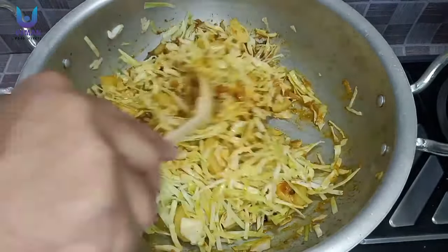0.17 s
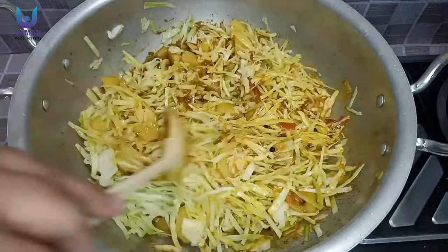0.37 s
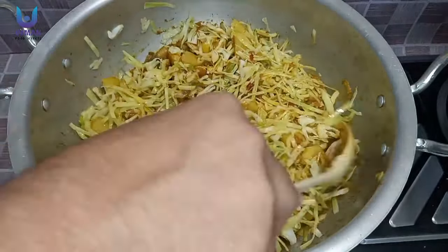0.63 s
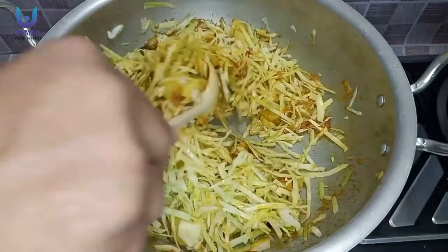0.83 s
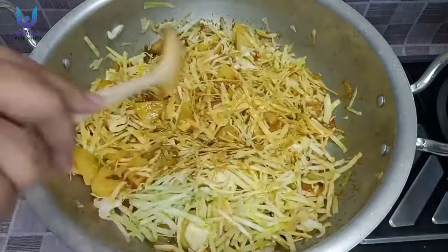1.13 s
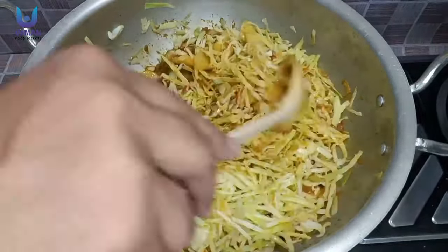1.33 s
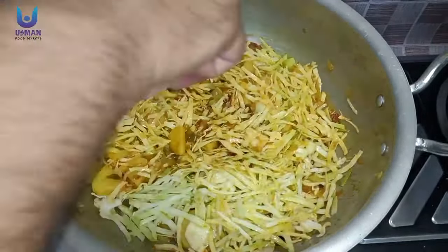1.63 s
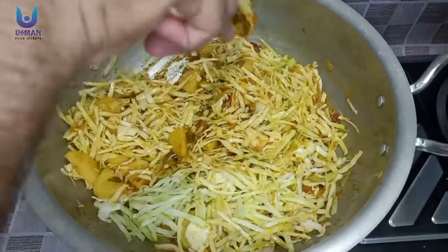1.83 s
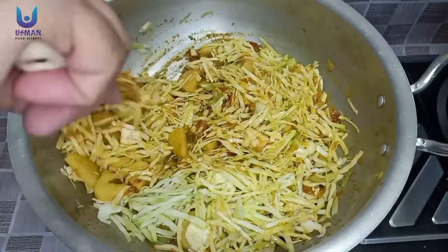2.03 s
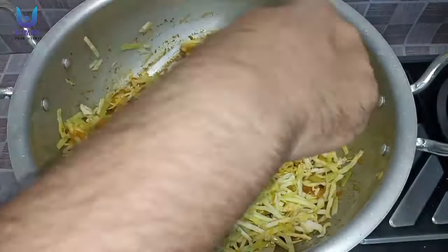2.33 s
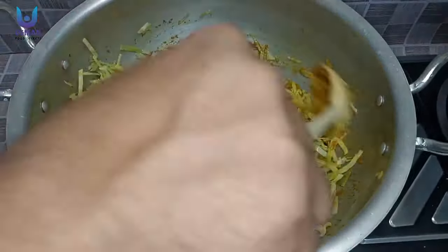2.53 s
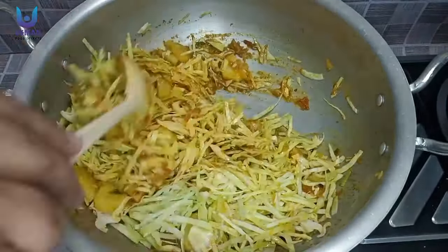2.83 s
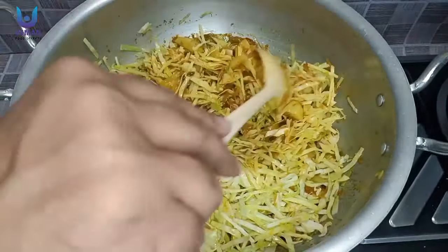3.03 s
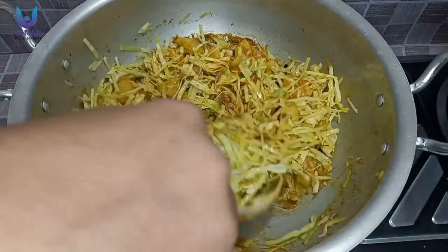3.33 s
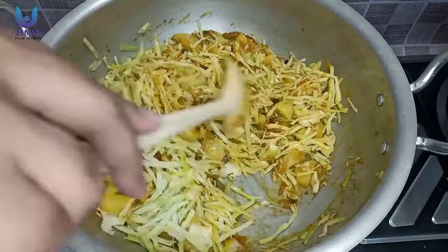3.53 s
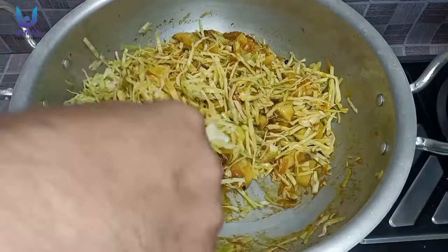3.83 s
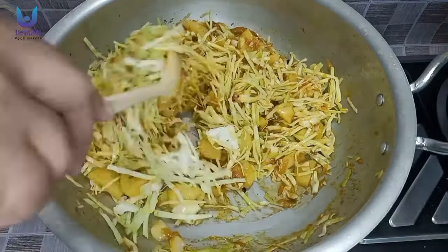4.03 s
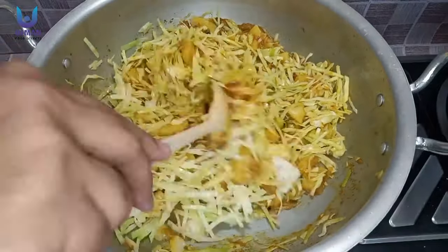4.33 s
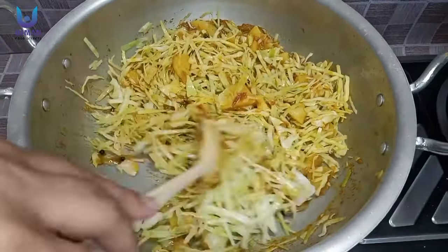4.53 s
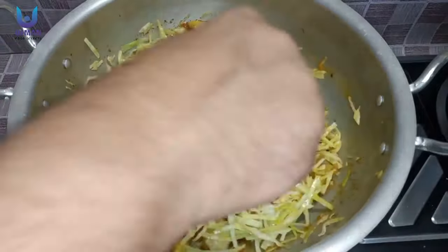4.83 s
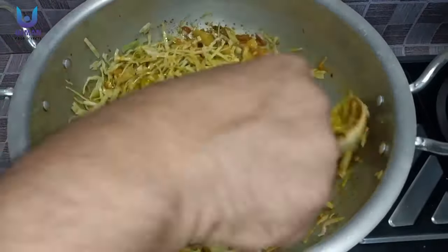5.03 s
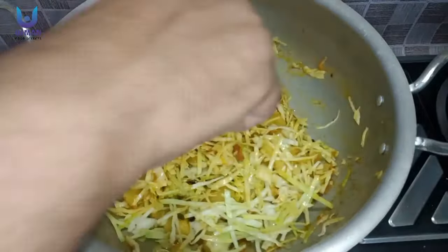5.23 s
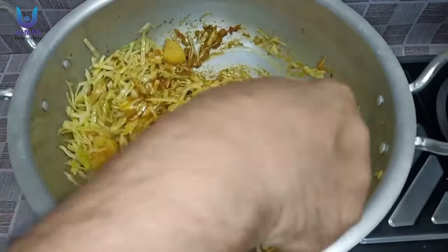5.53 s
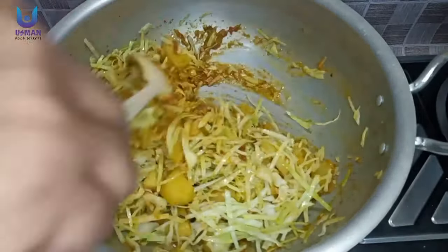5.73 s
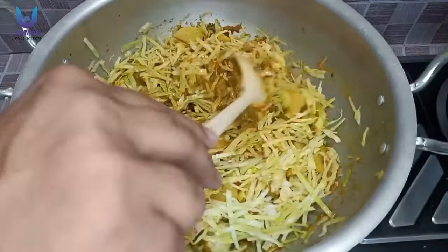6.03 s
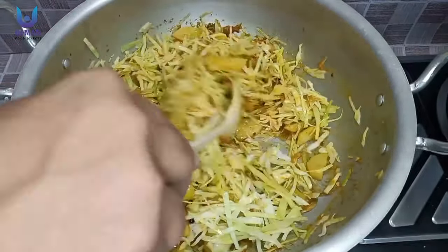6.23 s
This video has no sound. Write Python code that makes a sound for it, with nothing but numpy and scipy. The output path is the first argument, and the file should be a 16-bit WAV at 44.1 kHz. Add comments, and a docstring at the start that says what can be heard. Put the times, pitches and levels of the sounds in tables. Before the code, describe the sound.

Over the faint, steady hiss of oil and a gas burner, shredded vegetables rustle and crunch as they are turned in a metal pan. The wooden spoon strikes the pan with a short, bright clank early on, then twice more as the stirring continues. Light taps, dull scrapes and tiny squeaks fall in between. The sound is close, with a little small-kitchen echo.

```python
"""Shredded vegetables rustle and crunch as a wooden spoon stirs them in a wide metal pan.
Their sound is a sum of tiny random impulses that swells with each stroke. Friction makes the spoon
scuff and squeak along the bottom; light impacts click on the wall, and three knocks set the pan's
normal modes ringing. A small kitchen reflects these sounds. Under them lie the faint broadband
noise of sizzling oil and a gas burner, and a weak hum."""
import sys
import numpy as np
from scipy import signal
from scipy.fft import rfft, irfft, next_fast_len
from scipy.io import wavfile
from scipy.ndimage import uniform_filter1d

SR = 44100
rng = np.random.default_rng(int(sys.argv[2]) if len(sys.argv) > 2 else 0)


def pcm_store(signal):
    """Save signal as 16-bit PCM."""
    levels = np.round(np.clip(np.atleast_2d(signal), -1, 1) * 32767)
    wavfile.write(sys.argv[1], SR, levels.astype(np.int16).T)


N = 281954
BAND_EDGE_HZ = 15580

# Strokes through the shreds. Each row: fastest moment in seconds, rise and fall times in seconds,
# relative level in dB, weight of wet crunch over dry rustle in dB.
STROKES = [(0.02, 0.034, 0.087, -65.5, 6.5), (0.285, 0.055, .05, -65, 5.5), (0.51, 0.04, .04, -68, 4.5),
           (0.825, 0.034, 0.023, -56.5, 3), (0.98, 0.13, 0.08, -70.5, 1), (1.13, 0.042, 0.047, -60, 2.5),
           (1.34, 0.071, 0.07, -67.5, 1), (1.635, 0.02, 0.038, -76, 4), (1.752, 0.027, 0.015, -64, 7.5),
           (2.52, 0.18, 0.11, -66.5, 3.5), (2.79, 0.081, 0.087, -69, 4.5),
           (3.045, 0.079, 0.054, -64.5, 4.5), (3.35, .02, 0.024, -59.5, -20),
           (3.462, 0.077, 0.026, -55.5, -2), (3.66, 0.16, 0.071, -75.5, -2), (3.9, 0.1, 0.087, -60.5, -1),
           (3.975, 0.029, 0.051, -65.5, 6.5), (4.41, 0.065, .035, -60, 0), (4.63, 0.049, 0.036, -61, -3),
           (4.875, 0.026, 0.015, -59, -3), (4.95, 0.096, 0.063, -62.5, 1), (5.21, 0.036, 0.014, -63.5, 4.5),
           (5.39, 0.067, 0.11, -70, -1), (5.65, 0.07, 0.062, -59, -1.5), (5.78, 0.027, 0.063, -78, 13.5),
           (6.045, 0.079, 0.078, -64, 2.5), (6.28, 0.013, 0.02, -52, -12)]
# Spectra of the dry rustle and the wet crunch. Each row: frequency in Hz, relative density in dB.
RUSTLE_SPECTRUM = [(1500, -16), (3000, -1.5), (4500, 5.5), (6500, 10.5), (8300, 3.5), (10200, -5),
                   (12000, -15), (15500, -38)]
CRUNCH_SPECTRUM = [(150, -29), (400, -9), (1300, -6.5), (1850, -1.5), (2200, -6), (2900, 0.5), (3800, -7),
                   (6000, -15)]

# Knocks on the pan. Each row: start in seconds, level in dB, tilt in dB per octave,
# cutoff of the soft contact in Hz.
KNOCKS = [(0.6776, -25.5, 0.5, 5560), (2.3270, -30.5, -0.5, 3750), (5.0833, -28.5, .5, 4860)]
# Long-lived modes of the pan. Each row: frequency in Hz, relative level in dB, 60 dB decay in seconds.
PAN_MODES = [(565, -29, .33), (797, -28, .3), (1008, -15.5, .39), (1190, -19, .28), (1290, -13, .25),
             (1321, -13, .22), (1357, -9.5, .23), (1381, -12, .15), (1455, -13, .16), (1497, -16, .18),
             (1645, -19, .18), (1749, -19, .2), (2219, -15, .14), (2254, -3.5, .19), (2283, -13, .18),
             (2377, -11, .24), (2865, -23, .25), (3323, -15, .2), (3425, -9, .13), (3463, -1.5, .23),
             (3493, -7, .15), (4092, -18, .18), (4396, -11, .15), (4422, -8, .19), (4451, -12, .16),
             (5150, -16, .2)]
# Spectrum of the dense modes that the food damps. Each row: frequency in Hz, relative density in dB.
CLANK_SPECTRUM = [(90, -27), (240, -21.5), (400, -2.5), (500, -19.5), (900, -6.5), (1400, 3.5), (1900, -1),
                  (3000, -2.5), (4500, 3.5), (6000, -4), (8200, -4.5), (10000, -8.5), (12000, 0.5),
                  (15500, -10)]

# Light taps on wall and rim. Each row: start in seconds, level in dB, tilt in dB per octave,
# relative levels of snap and ring in dB.
CLICKS = [(1.6284, -58, 4, 1, -26), (1.7337, -58, -2, 7, -34), (1.9749, -39, -0.5, 5, -9.5),
          (2.026, -43, 5, -10, -21), (2.0742, -49.5, -4.5, 2.5, -14), (3.2397, -43.5, .5, 3, -30),
          (3.8937, -50, 0, 4.5, -33), (4.873, -52, -1.5, -8, -12), (5.1127, -39, -1, -4, -35),
          (5.5806, -45, 9.5, -15, -22), (6.271, -50, 2.5, -10, -39)]
# Spectrum of a tap. Each row: frequency in Hz, relative density in dB.
CLICK_SPECTRUM = [(100, -15), (300, -9), (650, -11.5), (1100, -6), (1700, -1), (2600, 17), (3900, -5),
                  (4600, 16), (5500, 6.5), (6500, 10), (8400, 7.5), (10200, -3.5), (12000, 5),
                  (15500, -7.5)]
# Modes of the rim. Each row: frequency in Hz, relative level in dB, 60 dB decay in seconds.
RIM_MODES = [(560, -14, .5), (871, -9, 0.22), (1334, -6.5, 0.14), (2460, 1, 0.14), (2520, -7, .14),
             (2530, -10, .12), (3410, 6, 0.08), (4300, 5, 0.08), (4710, -6, 0.13), (5000, -13, 0.12),
             (6025, -4, 0.2), (8600, -1, 0.09), (11850, -12, 0.16), (14320, -8, .15)]

# Dull scuffs of the spoon, and low thuds under two knocks. Each row: start in seconds, level in dB,
# rise in seconds, 60 dB decay in seconds, tilt in dB per octave.
SCUFFS_AND_THUDS = [(0.17, -62, 0.021, 1, -1.5), (0.684, -57, 0.018, 0.54, -10),
                    (1.05, -62.5, 0.0088, 0.24, -10), (1.976, -55, 0.0043, 0.21, -2.5),
                    (2.83, -58.5, 0.059, 0.092, -3.5), (2.968, -57.5, 0.014, 0.27, 4),
                    (3.037, -46.5, 0.0083, 0.11, -1.5), (3.240, -56.5, 0.0014, 0.25, -3.5),
                    (5.088, -54.5, 0.03, 0.17, -4), (5.757, -60, 0.0082, 0.19, -1),
                    (5.960, -58, 0.0066, 0.24, 3), (6.039, -43, 0.0032, 0.16, -0.5),
                    (6.23, -61.5, 0.055, 0.2, -4.5)]
# Spectrum of a scuff or thud. Each row: frequency in Hz, relative density in dB.
DULL_SPECTRUM = [(90, -34), (190, -13), (290, 4.5), (400, 0), (500, -0.5), (600, 7.5), (800, 4.5),
                 (1200, 2.5), (1800, 2.5), (2600, -6), (4000, -18), (8000, -29), (15000, -70)]
# Squeaks of the spoon, and one brief faint ring of the pan. Each row: start and length in seconds,
# first and last pitch in Hz, level in dB, rms jitter as a fraction of the pitch.
SQUEAKS_AND_RING = [(0.05, 0.18, 2590, 2640, -70, .02), (0.19, 0.12, 692, 885, -67.5, 0.11),
                    (1.045, 0.08, 555, 354, -71, 0.14), (1.07, 0.14, 330, 245, -73.5, 0.066),
                    (1.44, 0.237, 1271, 1214, -73.5, 0.018), (1.69, 0.14, 1160, 1110, -75, 0.025),
                    (1.725, 0.063, 2290, 2275, -62, 0.036), (4.04, 0.16, 1416, 1143, -72, 0.16)]

# Spectrum of burner and sizzle. Each row: frequency in Hz, relative density in dB.
STOVE_SPECTRUM = [(25, -17), (65, -22.5), (100, -8.5), (150, 0.5), (260, 3), (450, -8), (800, -4.5),
                  (1400, -9.5), (2700, -6), (4500, -6.5), (6500, -8.5), (8500, -5), (10200, -12),
                  (15500, -12.5)]
# Faint tones of the kitchen. Each row: mean frequency in Hz, level in dB.
HUM_TONES = [(565, -81), (1195, -87), (1787, -84), (2622, -85)]


def shreds(rustle_db=-1, crunch_db=-2, clump_db=0.8, idle_rustle_db=-74, idle_crunch_db=-75.5):
    """Incoherent addition: strips slide and snap independently, so the strokes add in power."""
    t = np.arange(N) / SR
    power = amp([[idle_rustle_db], [idle_crunch_db]]) ** 2  # the spoon never quite rests
    for peak_s, rise, fall, db, wet_db in STROKES:
        motion = stroke(t - peak_s, rise, fall)
        power = power + (amp([[db], [db + wet_db]]) * motion) ** 2
    dry_level, wet_level = np.sqrt(power) * amp(clump_db * drift(N, rate_hz=15))
    rustle = colour(dry_level * grains(N, per_s=7700, spread_db=3), RUSTLE_SPECTRUM)
    crunch = colour(wet_level * grains(N, per_s=5000, spread_db=0.4), CRUNCH_SPECTRUM)
    return amp(rustle_db) * rustle + amp(crunch_db) * crunch


def stroke(t, rise, fall, settle_db=-11, settle_t60=0.91):
    """Forcing and relaxation: a Gaussian push peaks at t = 0, then the heap settles exponentially."""
    push = np.exp(-(t / np.where(t < 0, rise, fall)) ** 2)
    settling = amp(settle_db) * fade(np.abs(t), settle_t60) * (t > 0)
    return np.maximum(push, settling)


def clumps(x, depth_db=3.0):
    """Spectral modulation: each clump of shreds has its own colour for a moment."""
    frames = dict(nperseg=512, noverlap=384)
    spectra = signal.stft(x, **frames)[2]
    patches = uniform_filter1d(rng.standard_normal(spectra.shape), size=8, axis=0)  # over frequency
    patches = uniform_filter1d(patches, size=12, axis=1)  # over time
    return signal.istft(spectra * amp(depth_db * unit_rms(patches)), **frames)[1][:N]


def knock(steel, db, tilt, cutoff_hz, clank_db=-4, clank_t60=0.088, sheen_db=-13, contact_s=0.0019):
    """Impact excitation: a blow starts the pan's long modes, a damped clank and the steel's shimmer."""
    def force_db(hz, floor_db=-19):
        """Compliant contact: wood gives way, so the force holds little above the cutoff."""
        low_pass = 1 / (1 + (hz / cutoff_hz) ** 6)
        return tilt * np.log2(hz / 2500) + 10 * np.log10(low_pass + amp(floor_db) ** 2)
    t = np.arange(len(steel)) / SR
    tone = ring([(hz, level + force_db(hz), t60) for hz, level, t60 in PAN_MODES], t)
    burst = fade(t, clank_t60) * rng.standard_normal(len(t))
    clank = colour(burst, [(hz, level + force_db(hz)) for hz, level in CLANK_SPECTRUM])
    sheen = colour(steel, [(hz, level + force_db(hz, floor_db=-11)) for hz, level in CLANK_SPECTRUM])
    onset = np.minimum(t / contact_s, 1)
    return amp(db) * (tone + amp(clank_db) * clank + amp(sheen_db) * sheen) * onset


def click(steel, db, tilt, snap_db, ring_db,
          snap_t60=0.029, shimmer_db=-12, rattle_db=-13, rattle_t60=0.25):
    """Impact transient: a sharp snap rattles on while the steel shimmers and the rim rings."""
    t = np.arange(len(steel)) / SR
    envelope = amp(snap_db) * fade(t, snap_t60) + amp(rattle_db) * fade(t, rattle_t60)
    strike = envelope * rng.standard_normal(len(t))
    tap = colour(strike + amp(shimmer_db) * steel, CLICK_SPECTRUM, tilt)
    return amp(db) * (tap + amp(ring_db) * ring(RIM_MODES, t))


def ring(modes, t):
    """Modal superposition: damped sinusoids start together, and close pairs beat."""
    return sum(amp(db) * fade(t, t60) * np.sin(2 * np.pi * hz * t) for hz, db, t60 in modes)


def shimmer(t60_at_2khz=0.3, count=420, damping_exponent=0.28):
    """Frequency-dependent damping: of the pan's many weak, inharmonic modes the higher die sooner."""
    t = np.arange(SR // 3) / SR
    offset, size, phase = rng.random((3, count, 1))
    hz = 100 + (np.arange(count)[:, None] + offset) * BAND_EDGE_HZ / count
    t60 = t60_at_2khz * (hz / 2000) ** -damping_exponent
    modes = size * fade(t, t60) * np.sin(2 * np.pi * (hz * t + phase))
    return modes.sum(axis=0) / np.sqrt(count / 6)


def scuff_or_thud(db, rise, t60, tilt):
    """Decaying shot noise: muffled impulses make the spoon's scuff, or a low thud under a knock."""
    t = np.arange(SR // 2) / SR
    envelope = np.minimum(t / rise, 1) * fade(np.maximum(t - rise, 0), t60)
    impulses = grains(len(t), per_s=5800, spread_db=3.7)
    return amp(db) * colour(envelope * impulses, DULL_SPECTRUM, tilt)


def squeak_or_ring(length, first_hz, last_hz, db, jitter, roughness=0.4):
    """Modulated oscillation: a brief, unsteady tone, as of a stick-slip squeak or a faint ring."""
    n = int(length * SR)
    hz = np.geomspace(first_hz, last_hz, n) * (1 + jitter * drift(n, rate_hz=480))
    envelope = np.sqrt(np.hanning(n)) * (1 + roughness * drift(n, rate_hz=36))
    return amp(db) * unit_rms(envelope * sine(hz))


def kitchen(x, early_db=-7, early_end_s=0.042, late_db=-13, late_t60=0.43):
    """Reverberation: nearby tiles and walls return early reflections, then a short diffuse tail."""
    t = np.arange(SR // 2) / SR
    early = grains(len(t), per_s=1600, spread_db=1.0) * (t > 0.004) * (t < early_end_s)
    late = rng.standard_normal(len(t)) * fade(t, late_t60) * (t > 0.02)
    echoes = amp(early_db) * early / np.linalg.norm(early) + amp(late_db) * late / np.linalg.norm(late)
    return signal.oaconvolve(x, echoes)[:N]


def stove(db=-66.5, waver_db=1.5):
    """Broadband noise: the flame's soft rush and the oil's countless tiny bubbles merge into a hiss."""
    hiss = colour(grains(N, per_s=9900, spread_db=-1.0), STOVE_SPECTRUM)
    return hiss * amp(db + waver_db * drift(N, rate_hz=7.3))


def hum(wander_hz=4):
    """Random frequency modulation: faint tones waver about their mean pitches."""
    return sum(amp(db) * unit_rms(sine(hz + wander_hz * drift(N, rate_hz=14.4))) for hz, db in HUM_TONES)


def grains(n, per_s, spread_db):
    """Shot noise of unit rms: impulses of random time, sign and size."""
    size = amp(spread_db * np.minimum(rng.exponential(1, n), 4))
    return unit_rms(size * rng.choice([-1, 1], n) * (rng.random(n) < per_s / SR))


def drift(n, rate_hz):
    """Low-pass noise: a random fluctuation of about unit rms, mostly below rate_hz."""
    size = next_fast_len(max(n, SR // 4))
    hz = np.fft.rfftfreq(size, 1 / SR)
    spectrum = rfft(rng.standard_normal(size)) / (1 + (hz / rate_hz) ** 2)
    return unit_rms(irfft(spectrum, size))[:n]


def colour(x, spectrum, tilt=0, size=4096):
    """Minimum-phase filtering at unit energy: imposes a spectrum, tilted in dB per octave."""
    octave = np.log2(np.abs(np.fft.fftfreq(size, 1 / SR)) + 1)
    hz, db = np.transpose(spectrum)
    gain_db = np.interp(octave, np.log2(hz), db) + tilt * np.maximum(octave, np.log2(hz[1]))
    response = np.exp(np.conj(signal.hilbert(np.log(amp(gain_db)))))
    taps = np.fft.ifft(response).real[:size // 2]
    return signal.oaconvolve(x, taps / np.linalg.norm(taps))[:len(x)]


def sine(hz):
    """Oscillation whose phase is the integral of its frequency."""
    return np.sin(2 * np.pi * np.cumsum(hz) / SR)


def fade(t, t60):
    """Exponential free decay, 60 dB down after t60."""
    return np.exp(-np.log(1000) * t / t60)


def amp(db):
    """Amplitude ratio of a level in decibels."""
    return 10 ** (np.asarray(db) / 20)


def unit_rms(x):
    """Normalisation to unit mean power."""
    return x / np.sqrt(np.mean(x ** 2) + 1e-20)


def add(mix, start_s, sound):
    """Superposition: a sound joins the mix at start_s."""
    part = mix[max(round(start_s * SR), 0):][:len(sound)]
    part += sound[:len(part)]


def scene(knock_room_db=-8, radiation_cutoff_hz=130):
    """Linear superposition: the stirring, its reflections and the background add at the listener."""
    stirring = clumps(shreds())
    steel = shimmer()
    knocks = np.zeros(N)
    for start_s, *row in SCUFFS_AND_THUDS:
        add(stirring, start_s, scuff_or_thud(*row))
    for start_s, *row in SQUEAKS_AND_RING:
        add(stirring, start_s, squeak_or_ring(*row))
    for start_s, *row in CLICKS:
        add(stirring, start_s, click(steel, *row))
    for start_s, *row in KNOCKS:
        add(knocks, start_s, knock(steel, *row))
    # the knocks ring clear, with less room echo than the stirring
    echoes = kitchen(stirring + amp(knock_room_db) * knocks)
    # a pan is too small to radiate deep bass
    bass_cut = signal.butter(2, radiation_cutoff_hz, "high", fs=SR, output="sos")
    heard = signal.sosfilt(bass_cut, stirring + knocks + echoes)
    return (heard + stove() + hum())[None]


def record(dry):
    """Band limiting: a linear-phase low-pass filter removes the highest treble."""
    taps = signal.firwin(511, BAND_EDGE_HZ, window=("kaiser", 9), fs=SR)
    return signal.oaconvolve(dry, taps[None], "same")


dry = scene()
out = record(dry)
pcm_store(out)
```